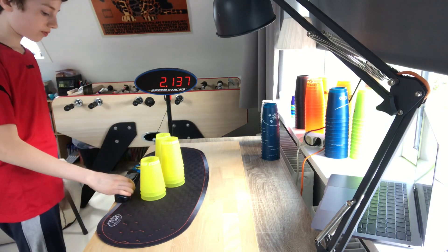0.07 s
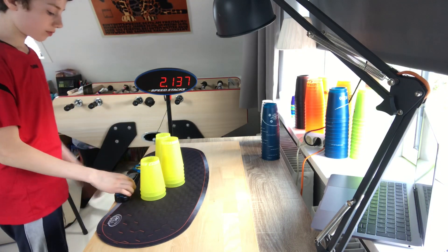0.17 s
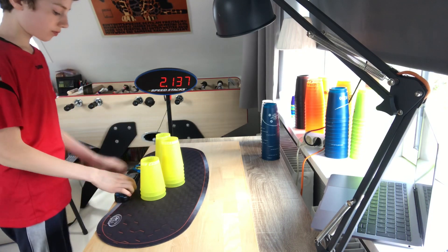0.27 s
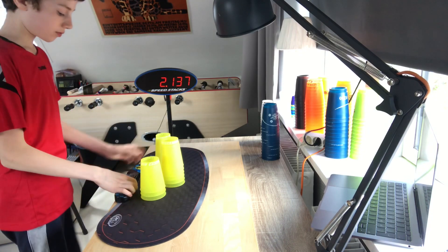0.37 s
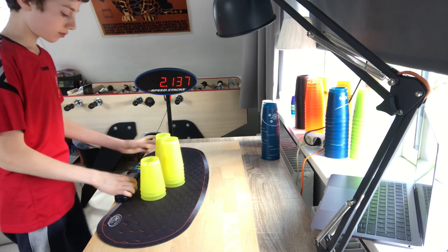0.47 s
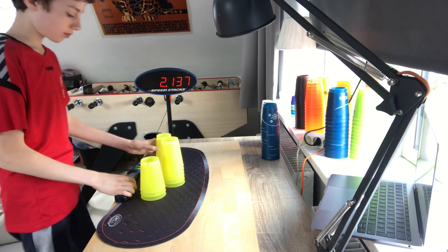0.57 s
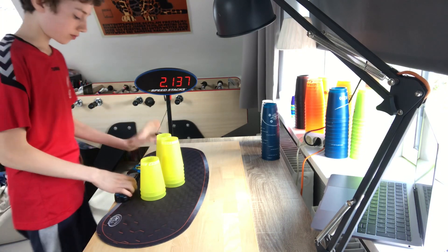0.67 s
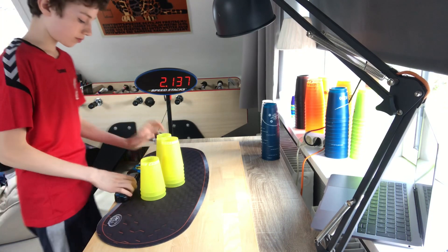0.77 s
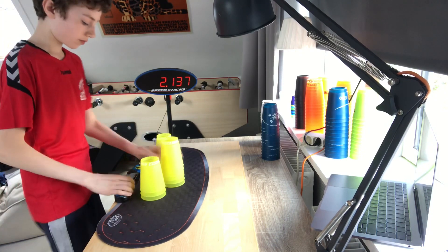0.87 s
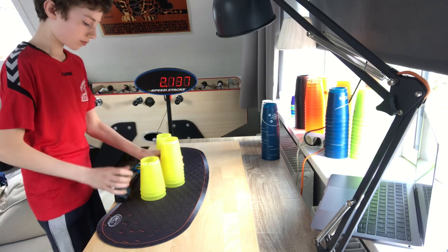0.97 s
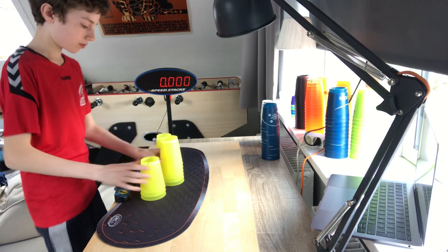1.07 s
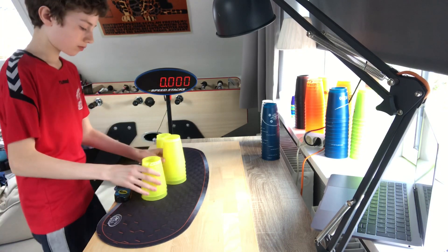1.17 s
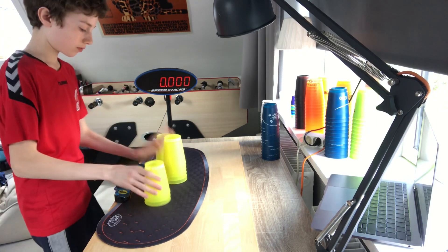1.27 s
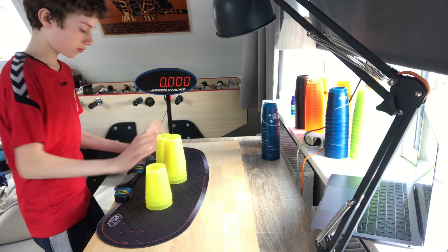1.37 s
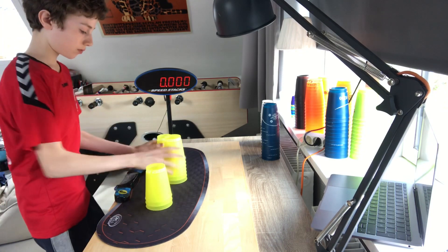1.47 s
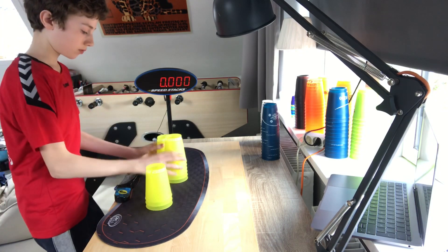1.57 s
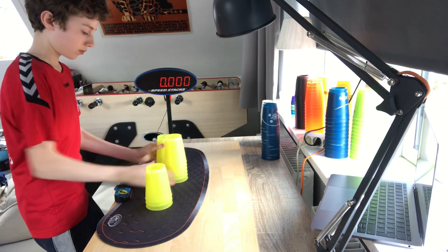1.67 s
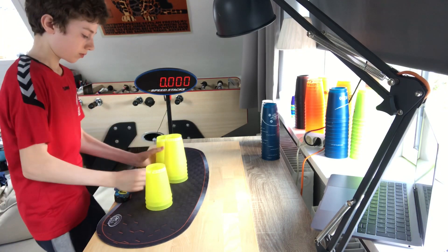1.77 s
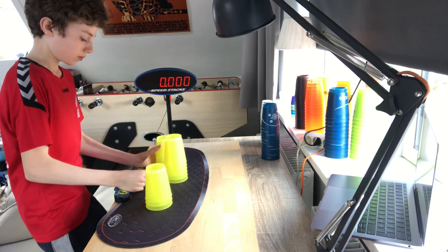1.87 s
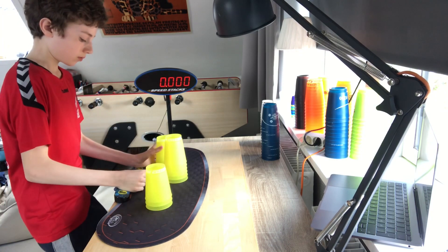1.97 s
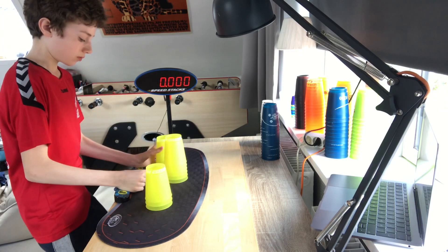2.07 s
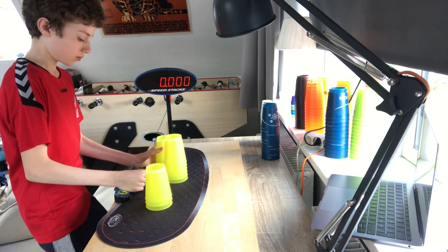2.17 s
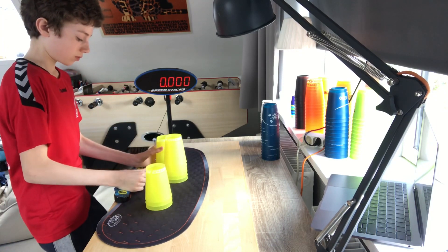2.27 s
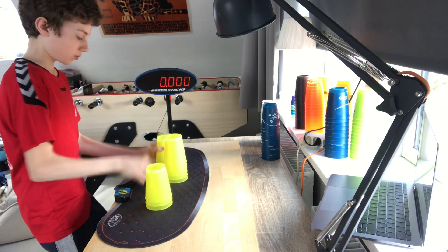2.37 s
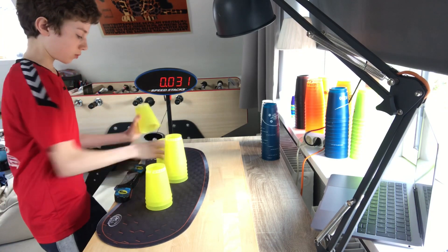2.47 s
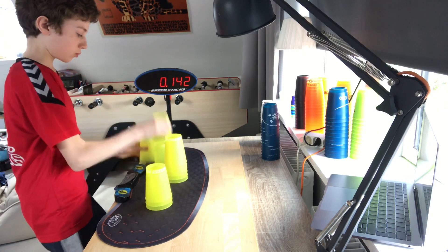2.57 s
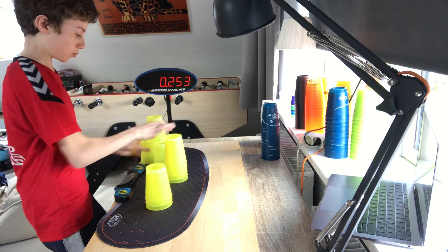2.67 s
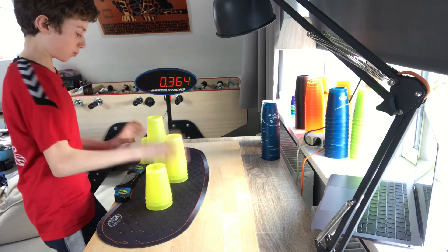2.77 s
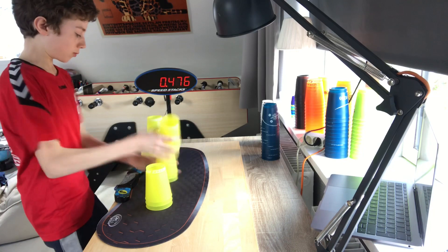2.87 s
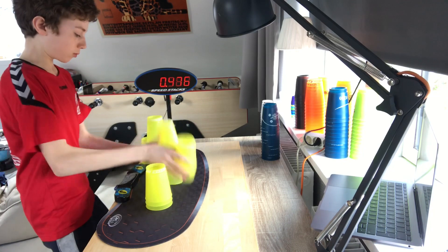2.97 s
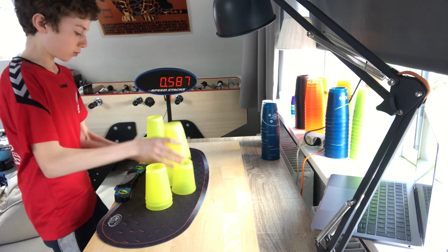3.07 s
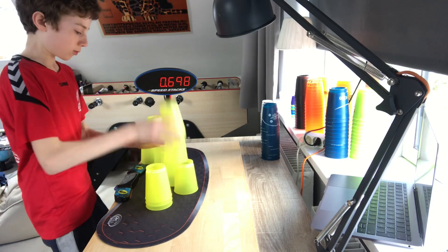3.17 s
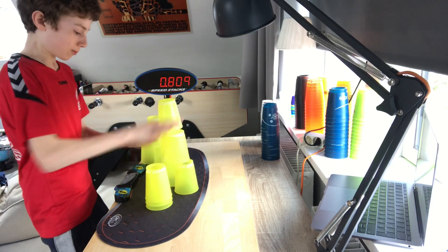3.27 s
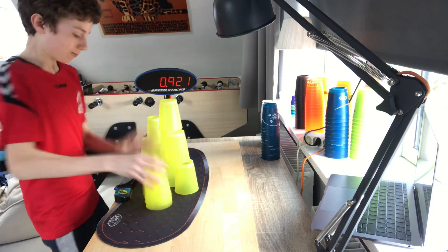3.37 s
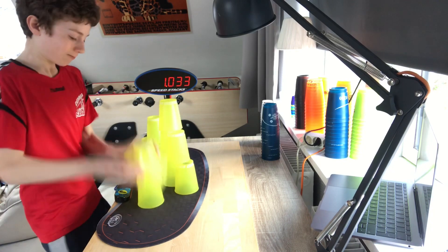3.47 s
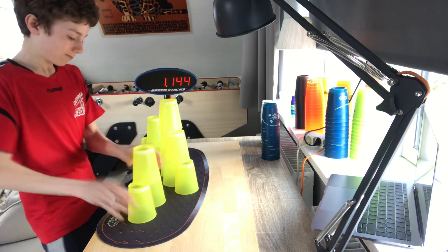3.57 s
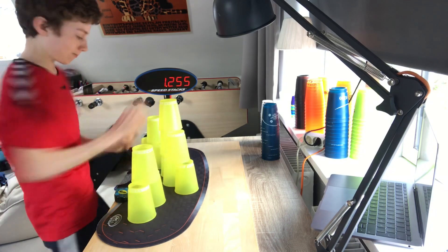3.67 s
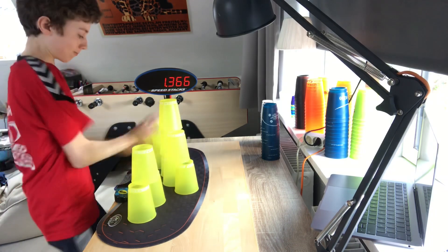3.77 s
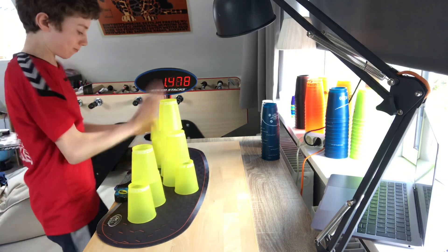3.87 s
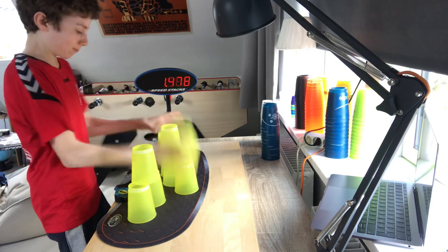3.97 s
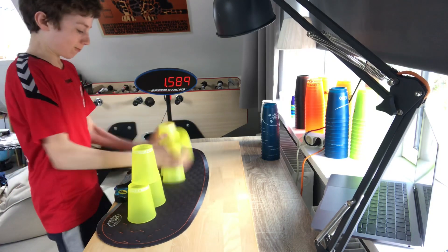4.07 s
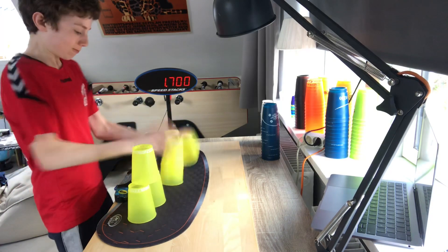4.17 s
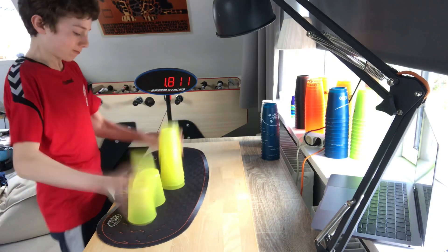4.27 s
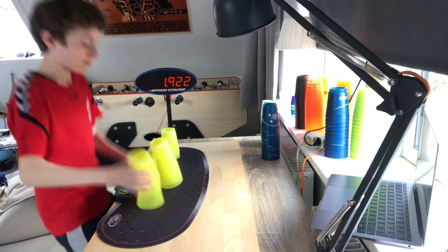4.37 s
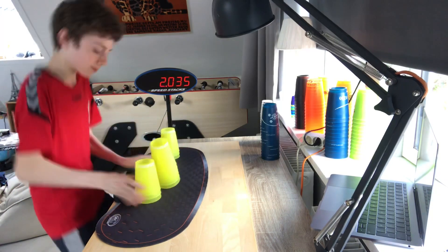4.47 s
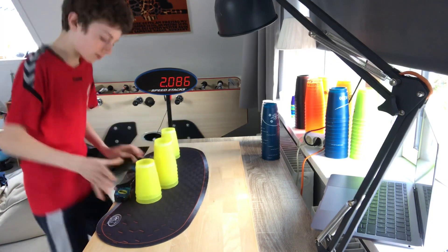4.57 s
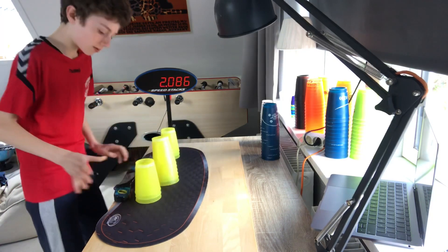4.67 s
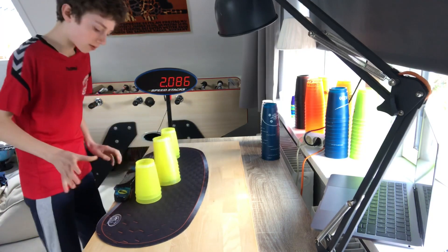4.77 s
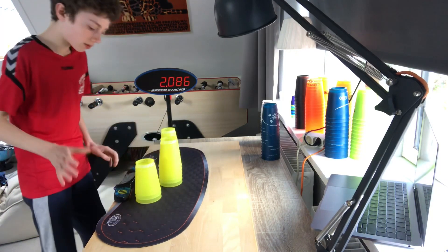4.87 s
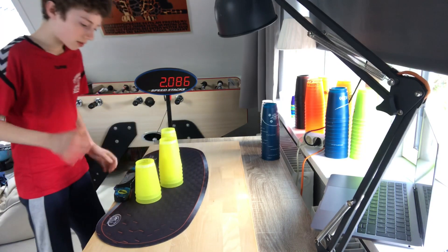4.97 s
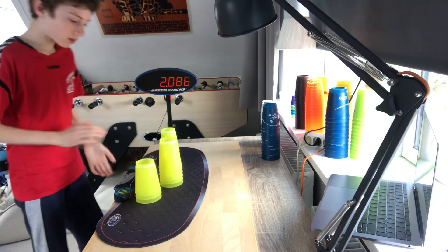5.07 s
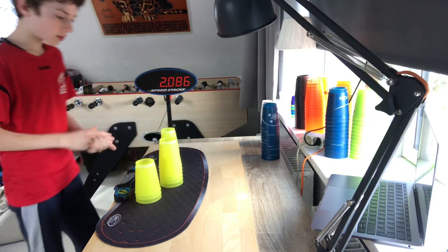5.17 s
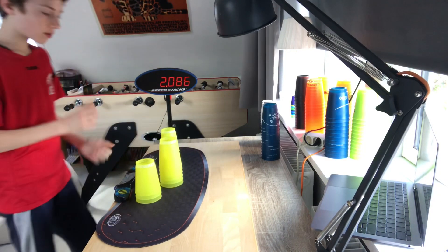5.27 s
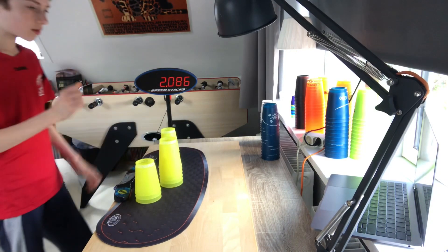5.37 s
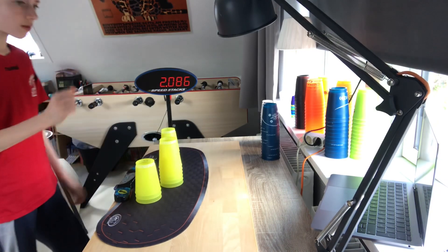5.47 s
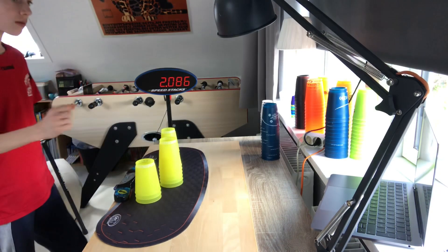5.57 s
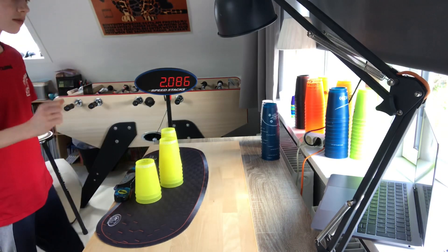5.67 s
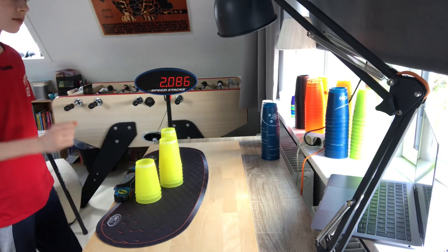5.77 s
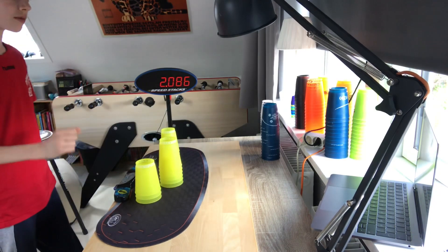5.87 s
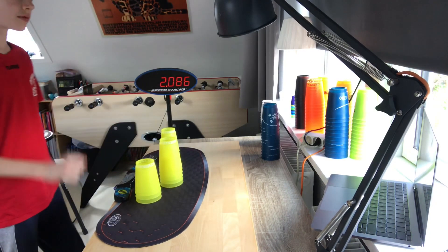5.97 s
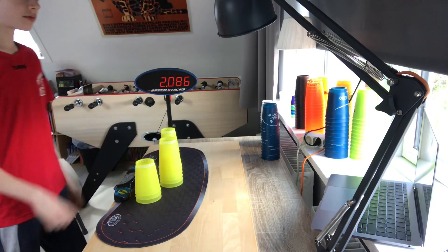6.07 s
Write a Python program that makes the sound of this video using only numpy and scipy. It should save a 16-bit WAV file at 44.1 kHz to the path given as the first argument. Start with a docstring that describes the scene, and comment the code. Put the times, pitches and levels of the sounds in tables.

```python
"""A desk in a small room: plastic stacking cups are set up and swept down on a mat.
Each landing knocks the cup wall, pops the air trapped between cups, clicks the rim and shakes the desk.
Hands tap cups and timer pads first, sleeves brush, cups rub and bump. A last slam leaves the desk
humming; fingers snap and something squeaks faintly over the room tone."""
import sys
import numpy as np
from scipy import signal
from scipy.fft import rfft, irfft, next_fast_len
from scipy.io import wavfile
from scipy.ndimage import uniform_filter1d

SR = 44100
rng = np.random.default_rng(int(sys.argv[2]) if len(sys.argv) > 2 else 0)


def generate_wav(sig):
    """Save sig (samples, or channels by samples) to the path in sys.argv[1] as 16-bit PCM at SR."""
    pcm = np.round(np.clip(np.atleast_2d(sig).T, -1, 1) * 32767).astype(np.int16)
    wavfile.write(sys.argv[1], SR, pcm)


N = 269098
BLOW_TIME_S = np.arange(SR // 8) / SR

# room decay (frequency [Hz], t60 [s])
ROOM_DECAY = [(100, 0.39), (260, 0.68), (700, 0.27), (1840, 0.35), (4850, 0.24), (12800, 0.17)]
# room tone (frequency [Hz], level [dB])
ROOM_TONE_SPECTRUM = [(12, -37.5), (20, -13.5), (37, 2), (134, -4), (172, -8), (262, -6.5), (434, -13.5),
                      (542, -14), (590, -16), (825, -17), (1190, -19.5), (1910, -23), (16000, -35.5)]
# hands on cups and timer pads (time [s], slap level [dB], desk level [dB])
HAND_TAPS = [(0.498, -54, -59), (1.209, -28.5, -44), (1.392, -49.5, -41), (1.453, -35.5, -36),
             (1.506, -44, -36.5), (1.659, -47.5, -46), (1.6887, -8.5, -20.5), (2.268, -50, -76),
             (2.355, -45, -50)]
# hand slap (frequency [Hz], level [dB])
SLAP_SPECTRUM = [(120, -38), (200, -19), (263, -6.5), (334, -22.5), (409, -6), (722, -8.5), (1300, -4.5),
                 (2130, -13), (2910, -11), (4860, -21.5), (5940, -17.5), (16000, -37.5)]
# air under a cupped hand (frequency [Hz], level [dB], t60 [s])
CUPPED_HAND_MODES = [(561, -2.5, 0.026), (1004, 1.5, 0.014), (1281, 5, 0.0073), (1841, -9.5, 0.018),
                     (2812, -23, 0.004)]
# desk top (frequency [Hz], level [dB], t60 [s])
DESK_TOP_MODES = [(147.5, -13.5, 0.17), (199.4, -12.5, 0.12), (271.2, -3.5, 0.29), (296, -4.5, .1),
                  (350, 0.5, 0.02)]
# sleeve or hand passes (peak time [s], length [s], level [dB])
BRUSHES = [(0.511, .05, -64), (0.871, 0.16, -58), (0.979, 0.083, -61.5), (1.156, 0.26, -61.5),
           (1.397, .06, -58), (1.615, 0.22, -60), (4.589, .42, -52), (5.426, .4, -73.5)]
# cloth friction (frequency [Hz], level [dB])
CLOTH_SPECTRUM = [(40, -28.5), (500, 2.5), (1500, 1.5), (3500, -1), (5000, -6), (7000, -4.5), (10000, -19),
                  (16000, -19.5)]
# heavy pushes on the desk (time [s], level [dB])
DESK_PUSHES = [(0.982, -46.5), (1.733, -37.5), (3.76, -34), (3.95, -34.5), (4.364, -14)]
# desk frame (frequency [Hz], level [dB], t60 [s])
DESK_FRAME_MODES = [(44, -31, 2.2), (58.5, 1, 0.33), (72, -32.5, 4.8), (72.5, 4, 0.18), (77, -37.5, 2.6),
                    (84.6, -5.5, 0.7), (112, -10.5, 0.17), (141, -12, 0.55), (167.5, -4, 0.26)]
# cup-on-cup sliding, stacking up then sweeping down (time [s], level [dB])
SLIDE_LEVELS = [(2.325, -100), (2.365, -47), (2.42, -74), (2.8, -58.5), (3.2, -50.5), (3.52, -49.5),
                (3.6, -76), (3.71, -70), (3.77, -33), (3.9, -38.5), (3.95, -30), (4.03, -34), (4.2, -39.5),
                (4.26, -24.5), (4.3, -40.5), (4.37, -25.5), (4.6, -110)]
# hard surfaces meeting (frequency [Hz], level [dB])
CRACK_SPECTRUM = [(40, -54.5), (300, -8.5), (1500, 0.5), (4000, -0.5), (6500, -4), (8000, -6.5),
                  (10500, -15.5), (12500, -12.5), (16000, -20.5)]
# cup wall bending (frequency [Hz], level [dB], t60 [s])
WALL_MODES = [(418, -10.5, 0.025), (616, -5, 0.03), (842, -1, 0.019), (1065, 0, .018), (1315, 0, 0.018),
              (1683, -9.5, 0.02), (2100, -4.5, 0.0081)]
# stiff cup rim (frequency [Hz], level [dB], t60 [s])
RIM_MODES = [(2950, -1.5, 0.0053), (3554, -1.5, 0.01), (4300, -6, 0.054), (6000, -15, 0.031),
             (5782, 6.5, 0.013), (7100, -9, 0.02)]
# cup landings on mat or cups (time [s], knock level [dB], air pocket pitch [Hz],
# click level [dB], desk level [dB], second touch gain [dB])
LANDINGS = [(2.464, -41.5, 500, -49.5, -38.5, -4.5), (2.536, -41, 830, -35, -39, -1),
            (2.56, -37.5, 560, -44.5, -27.5, -8), (2.605, -3.5, 995, -20.5, -23.5, -14.5),
            (2.61, -7, 592, -12, -20, -14.5), (2.7623, -26, 520, -27, -21.5, -18.5),
            (2.818, -36.5, 650, -28.5, -29, -7.5), (2.844, -18.5, 1500, -25.5, -25, -12.5),
            (2.893, -19, 920, -25, -31.5, -20.5), (2.972, -8.5, 1070, -20.5, -16, -4),
            (3.046, -13.5, 500, -26.5, -20, -8), (3.1356, -10.5, 964, -20.5, -27.5, -17.5),
            (3.151, -15, 840, -33, -29.5, -7.5), (3.181, -14.5, 1019, -29.5, -22, 1),
            (3.2074, -4.5, 1344, -15.5, -26, 0), (3.289, -19.5, 1344, -40.5, -43.5, -21),
            (3.328, -37.5, 1091, -32.5, -32.5, -19), (3.373, -19.5, 834, -18, -33.5, -7),
            (3.444, -23.5, 913, -17.5, -37, -12), (3.4762, 0.5, 988, -23, -16.5, 0),
            (3.5055, -3.5, 1234, -17, -32, -18), (3.511, -9.5, 743, -10, -13.5, -8.5),
            (3.7192, -7.5, 539, -30, -15.5, -11.5), (3.741, -22, 570, -21, -24, -13),
            (3.76, -21, 1100, -20, -23, -0.5), (3.791, -12.5, 939, -26, -36.5, -13),
            (3.839, -18, 900, -20, -35.5, -12), (3.876, -24, 1000, -18.5, -28, -12),
            (3.902, -14, 1300, -28.5, -28, 0), (3.9217, -8.5, 533, -2.5, -30.5, -13.5),
            (3.942, -12.5, 1300, -1, -25.5, -5), (3.957, -2.5, 732, -11.5, -19, -17),
            (3.968, -7, 906, -4.5, -7.5, -4.5), (4.091, -14, 2010, -12, -28, -14.5),
            (4.155, -21.5, 780, -18.5, -22.5, -17), (4.188, -15, 1800, -28, -29, -18.5),
            (4.214, -12.5, 900, -23, -24.5, -5), (4.2324, -10, 1411, -4, -26, -21),
            (4.2417, -1.5, 1527, -7, -16, -5.5), (4.263, -10.5, 695, -18.5, -15.5, -13),
            (4.314, -10, 920, -13.5, -37, -14), (4.335, -7.5, 600, -18.5, -13.5, -3.5),
            (4.357, -2.5, 805, -2.5, -21, -13), (4.368, -3, 804, -12, -18, -13.5),
            (4.3885, -4.5, 924, -6, -9, -7), (4.788, -35.5, 800, -40, -22.5, -16.5),
            (4.821, -25.5, 680, -34.5, -29, -16.5), (4.885, -38.5, 500, -58, -37, -6.5)]
# trapped air: a flat landing holds more, pitched lower (pitch [Hz], share of knock energy [0-1])
POCKET_SHARE = [(550, 0.8), (950, 0.5)]
# finger slips off the thumb, then hits the palm (time [s], level [dB])
SNAP_HITS = [(5.0953, -21), (5.0967, -5.5)]
# hollow between curled fingers and palm (frequency [Hz], level [dB])
PALM_SPECTRUM = [(120, -24.5), (200, -21), (278, -10.5), (373, -19.5), (635, -12.5), (836, -10.5),
                 (1740, -15.5), (2420, -4), (4600, -14), (4950, -20), (5940, -17.5), (10700, -30),
                 (14100, -27), (16000, -41)]
# air in the curled hand (frequency [Hz], level [dB], t60 [s])
CURLED_HAND_MODES = [(2504, -0.5, 0.0085), (3320, -0.5, .006)]
# squeak glide (time [s], pitch [Hz], level [dB])
SQUEAK_GLIDE = [(5.94, 3740, -92), (5.96, 3640, -69), (5.99, 3553, -71), (6.005, 3330, -67),
                (6.04, 3280, -78), (6.09, 3320, -64)]


def amp(db):
    """dB to gain."""
    return 10 ** (np.asarray(db) / 20)


def unit_rms(x):
    """Scale to rms 1."""
    return x / np.sqrt(np.mean(x ** 2) + 1e-20)


def unit_blow(x):
    """Scale to the energy of 1 ms at full level."""
    return x / np.sqrt(np.sum(x ** 2) * 1000 / SR + 1e-20)


def log_interp(points, hz):
    """Interpolate (frequency [Hz], value) points on a log axis."""
    points_hz, values = np.transpose(points)
    return np.interp(np.log(hz + 1), np.log(points_hz + 1), values)


def curves(rows):
    """Per-sample curve for each column after time."""
    times_s, *columns = np.transpose(rows)
    return [np.interp(np.arange(N) / SR, times_s, column) for column in columns]


def coloured(x, spectrum):
    """Filter by (frequency [Hz], level [dB]) points."""
    size = next_fast_len(len(x))
    gain = amp(log_interp(spectrum, np.fft.rfftfreq(size, 1 / SR)))
    return irfft(rfft(x, size) * gain, size)[:len(x)]


def add(track, time_s, sound):
    """Mix a sound in at time_s."""
    start = round(time_s * SR)
    track[start:start + len(sound)] += sound[:N - start]


def ring(modes, attack_s, t=BLOW_TIME_S, detune=0, scatter_db=0):
    """Damped modes, optionally scattered in pitch and level."""
    hz, db, t60_s = np.transpose(modes)[:, :, None]
    pitch_draw, level_draw = rng.standard_normal((2, len(modes), 1))
    polarity = (-1) ** np.arange(len(modes))[:, None]
    envelopes = amp(db + scatter_db * level_draw - 60 * t / t60_s)
    waves = np.sin(2 * np.pi * hz * (1 + detune * pitch_draw) * t)
    return (polarity * envelopes * waves).sum(0) * (1 - np.exp(-t / attack_s))


def in_room(x, wet_db, direct=True):
    """Optional direct path plus a fresh diffuse tail; treble dies first."""
    hz, frame_s, noise = signal.stft(rng.standard_normal(SR // 2), SR, nperseg=256)
    decay = amp(-60 * frame_s / log_interp(ROOM_DECAY, hz)[:, None])
    tail = signal.istft(noise * decay, SR, nperseg=256)[1]
    tail *= 1 - np.exp(-(np.arange(len(tail)) / SR / 0.0011) ** 2)  # nearest walls answer first
    response = amp(wet_db) * tail / np.linalg.norm(tail)
    response[0] = float(direct)
    return signal.fftconvolve(x, response)


def room_tone():
    """Steady quiet rumble and hiss."""
    return amp(-64) * unit_rms(coloured(rng.standard_normal(N), ROOM_TONE_SPECTRUM))


def impact(spectrum):
    """Minimum-phase pulse with this spectrum."""
    size = len(BLOW_TIME_S)
    gain = amp(log_interp(spectrum, np.fft.rfftfreq(2 * size, 1 / SR)))
    cepstrum = irfft(np.log(gain))
    cepstrum[1:size] *= 2
    cepstrum[size + 1:] = 0
    return unit_blow(irfft(np.exp(rfft(cepstrum)))[:size])


def slap(spectrum, t60_s, attack_s=0.00054):
    """Flesh lands spread over a few ms."""
    t = BLOW_TIME_S
    contact = rng.standard_normal(len(t)) * amp(-60 * t / t60_s) * (1 - np.exp(-t / attack_s))
    return unit_blow(signal.fftconvolve(contact, impact(spectrum))[:len(t)])


def desk_boom():
    """Desk top rings under the mat, slightly detuned at each spot."""
    return unit_blow(ring(DESK_TOP_MODES, attack_s=0.002, t=np.arange(SR // 2) / SR, detune=0.023))


def hand_taps():
    """Hands slap, squeeze out the air beneath and push the desk."""
    out = np.zeros(N)
    hollow = unit_blow(ring(CUPPED_HAND_MODES, attack_s=0.00099))
    for time_s, slap_db, desk_db in HAND_TAPS:
        add(out, time_s, amp(slap_db - 3) * slap(SLAP_SPECTRUM, t60_s=0.024))
        # the tail sums all directions, so it has the slap's smooth mean spectrum
        add(out, time_s, amp(slap_db) * in_room(impact(SLAP_SPECTRUM), wet_db=-4.5, direct=False))
        add(out, time_s, amp(slap_db + 2) * in_room(hollow, wet_db=-14))
        add(out, time_s, amp(desk_db) * desk_boom())
    return out


def sleeve_brushes(rise_share=0.19, edge_drop_db=13.5):
    """Cloth and skin rub in soft swells as the arms move."""
    envelope, t = np.zeros(N), np.arange(N) / SR
    for peak_s, length_s, db in BRUSHES:
        from_peak = np.maximum((peak_s - t) / rise_share, (t - peak_s) / (1 - rise_share)) / length_s
        envelope += amp(db - edge_drop_db * from_peak)
    return envelope * unit_rms(coloured(rng.standard_normal(N), CLOTH_SPECTRUM))


def desk_thumps():
    """Heavy pushes sway the frame; its slowest-decaying mode hums on."""
    out = np.zeros(N)
    sway = ring(DESK_FRAME_MODES, attack_s=0.011, t=np.arange(N) / SR)
    for time_s, db in DESK_PUSHES:
        add(out, time_s, amp(db) * sway)
    return out


def cup_sliding(slips_per_s=3500):
    """Cup walls rub in clumps of tiny slips that make them ring."""
    clumps = unit_rms(uniform_filter1d(rng.standard_normal(N), size=400))
    slips = rng.standard_normal(N) * amp(3 * rng.standard_normal(N) + 3.5 * clumps)
    slips *= rng.random(N) < slips_per_s / SR
    wall = ring(WALL_MODES, attack_s=0.00047)
    scrape = unit_rms(coloured(slips, CRACK_SPECTRUM))
    body = amp(-7.5) * unit_rms(signal.fftconvolve(slips, wall)[:N])
    return in_room((scrape + body) * amp(curves(SLIDE_LEVELS)[0]), wet_db=-2.5)[:N]


def chatter(x, t60_s, rebound_db=-9, rebounds_per_s=900):
    """A light cup rebounds within milliseconds of contact."""
    t = BLOW_TIME_S
    contacts = rng.standard_normal(len(t)) * (rng.random(len(t)) < rebounds_per_s / SR)
    contacts *= amp(rebound_db - 60 * t / t60_s)
    contacts[0] = 1
    return unit_blow(signal.fftconvolve(x, contacts)[:len(t)])


def crack(t60_s):
    """Noise burst of two hard surfaces meeting."""
    noise = coloured(rng.standard_normal(len(BLOW_TIME_S)), CRACK_SPECTRUM)
    return unit_blow(noise * amp(-60 * BLOW_TIME_S / t60_s))


def cup_touch(knock_db, pocket_hz, click_db, pocket_t60_s=0.018):
    """One contact: wall knock, rim click and trapped air, pitched by the gap between cups."""
    air_share = log_interp(POCKET_SHARE, pocket_hz)
    wall = ring(WALL_MODES, attack_s=0.0004, detune=0.04, scatter_db=2)
    rim = ring(RIM_MODES, attack_s=0.0002, detune=0.11, scatter_db=3)
    pocket = unit_blow(ring([(pocket_hz, 0, pocket_t60_s)], attack_s=0.003))
    knock = unit_blow(np.sqrt(1 - air_share) * chatter(wall, t60_s=0.035) + np.sqrt(air_share) * pocket)
    click = unit_blow(amp(-5) * chatter(rim, t60_s=0.02) + crack(t60_s=0.014))
    return in_room(amp(knock_db) * knock, wet_db=-6) + in_room(amp(click_db) * click, wet_db=-3.5)


def cup_landings(gap_s=0.0057, third_touch_loss_db=3.5):
    """A tilted cup rocks edge to edge in three touches; the desk booms on the first."""
    out = np.zeros(N)
    for time_s, knock_db, pocket_hz, click_db, desk_db, second_db in LANDINGS:
        add(out, time_s, cup_touch(knock_db, pocket_hz, click_db))
        add(out, time_s, amp(desk_db) * desk_boom())
        for k, late_db in enumerate([second_db, second_db - third_touch_loss_db], 1):
            time_draw, pitch_draw = rng.standard_normal(2)
            late_hz = pocket_hz * np.exp(0.13 * pitch_draw - 0.017 * k)
            late = cup_touch(knock_db - 1, late_hz, click_db + 2)  # less wall, more rim
            add(out, time_s + gap_s * (k + 0.12 * time_draw), amp(late_db) * late)
    return out


def cup_jostling(start_s=3.0, end_s=4.3, count=20, db_per_slide_db=0.55, scatter_db=3.5):
    """Chance bumps between held cups, louder with harder sliding."""
    out, slide_db = np.zeros(N), curves(SLIDE_LEVELS)[0]
    times_s = start_s + (np.arange(count) + rng.random(count)) * (end_s - start_s) / count
    for time_s, (level_draw, pitch_draw) in zip(times_s, rng.standard_normal((count, 2))):
        db = db_per_slide_db * (slide_db[round(time_s * SR)] - slide_db.max()) + scatter_db * level_draw
        bump = cup_touch(knock_db=-22.5, pocket_hz=950 * np.exp(0.29 * pitch_draw), click_db=-29.5)
        add(out, time_s, amp(db) * bump)
    return out


def finger_snap():
    """A crack into the hollow between curled fingers and palm."""
    out = np.zeros(N)
    hollow = unit_blow(ring(CURLED_HAND_MODES, attack_s=0.0003))
    for time_s, db in SNAP_HITS:
        add(out, time_s, amp(db - 4) * slap(PALM_SPECTRUM, t60_s=0.025))
        add(out, time_s, amp(db) * in_room(impact(PALM_SPECTRUM), wet_db=-8.5, direct=False))
        add(out, time_s, amp(db - 5.5) * in_room(hollow, wet_db=-8))
    return out


def squeak():
    """Faint wavering tone, falling in pitch."""
    hz, db = curves(SQUEAK_GLIDE)
    waver = unit_rms(uniform_filter1d(rng.standard_normal(N), size=120))
    tone = np.sin(2 * np.pi * np.cumsum(hz * (1 + 0.025 * waver)) / SR)
    started = np.arange(N) / SR > SQUEAK_GLIDE[0][0]
    return in_room(tone * amp(db) * started, wet_db=3.5)[:N]


def scene():
    """Mono sum at one microphone on the desk."""
    stacking = cup_landings() + cup_jostling() + hand_taps() + cup_sliding() + sleeve_brushes()
    return (stacking + desk_thumps() + finger_snap() + squeak() + room_tone())[None]


def record(dry, low_cut_hz=36, top_hz=16000):
    """Microphone bass roll-off, soft clip, band limit."""
    thinned = signal.sosfilt(signal.butter(2, low_cut_hz, "highpass", fs=SR, output="sos"), dry)
    clipped = thinned / (1 + np.abs(thinned) ** 6) ** (1 / 6)
    size = next_fast_len(N + SR // 4)
    passband = np.fft.rfftfreq(size, 1 / SR) < top_hz
    return irfft(rfft(clipped, size) * passband, size)[:, :N]


dry = scene()
out = record(dry)
generate_wav(out)
```